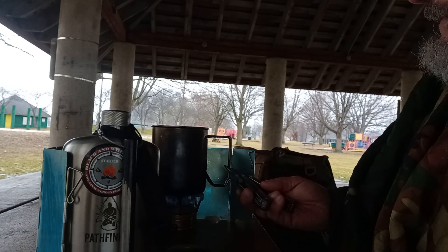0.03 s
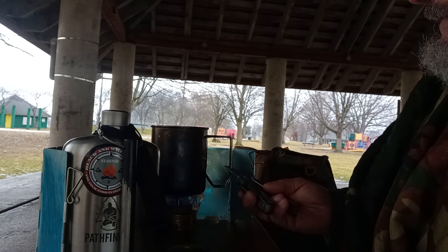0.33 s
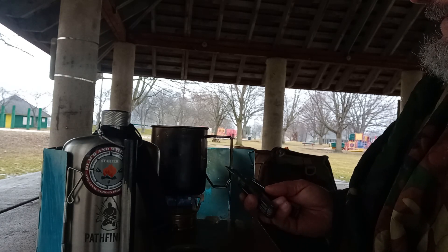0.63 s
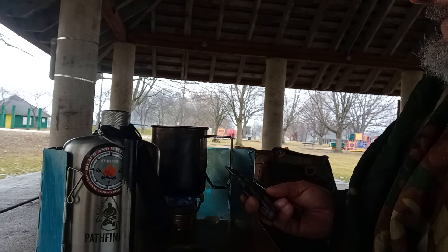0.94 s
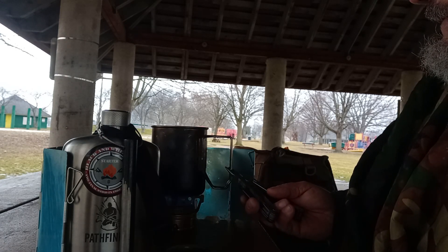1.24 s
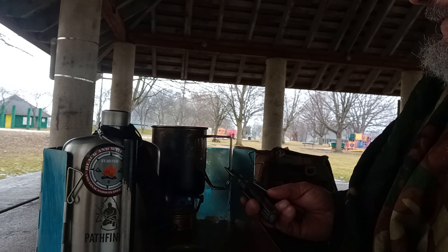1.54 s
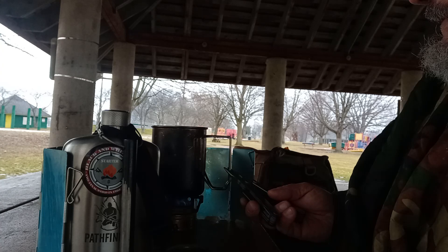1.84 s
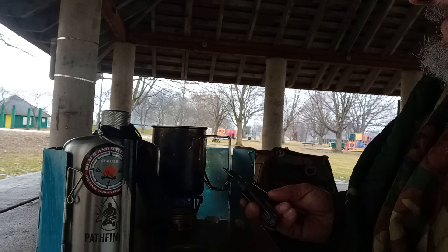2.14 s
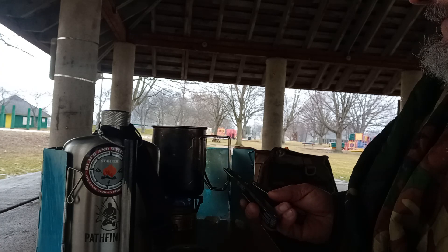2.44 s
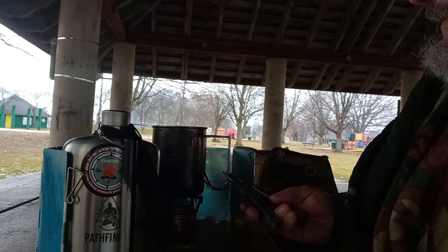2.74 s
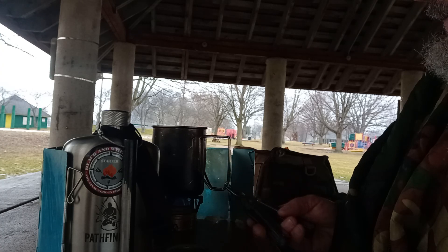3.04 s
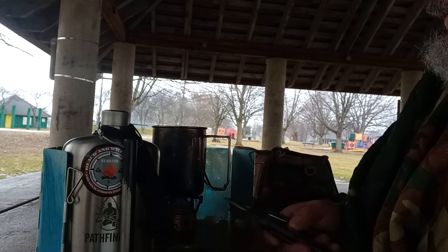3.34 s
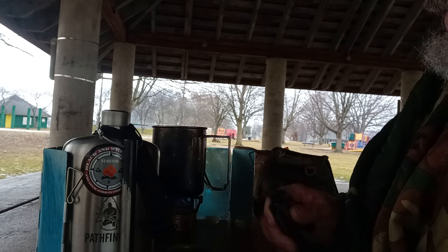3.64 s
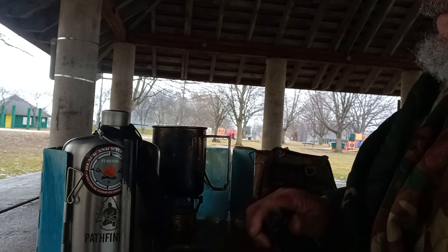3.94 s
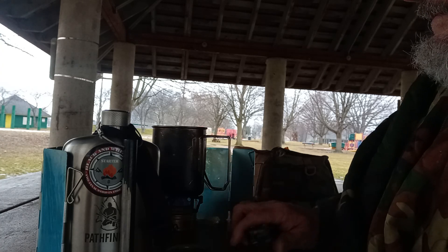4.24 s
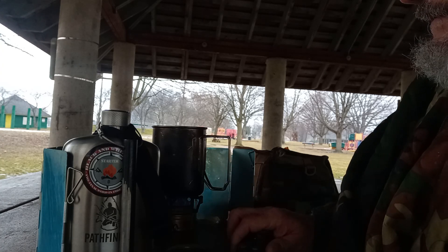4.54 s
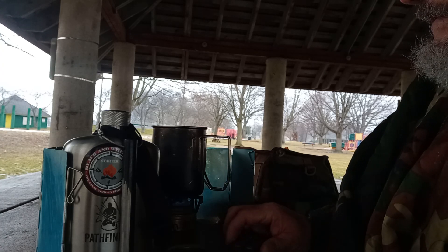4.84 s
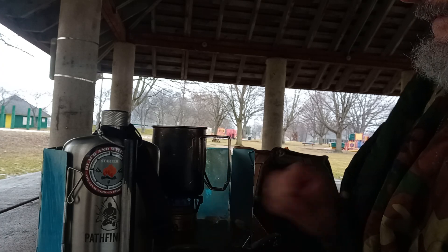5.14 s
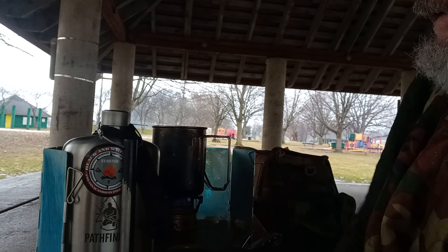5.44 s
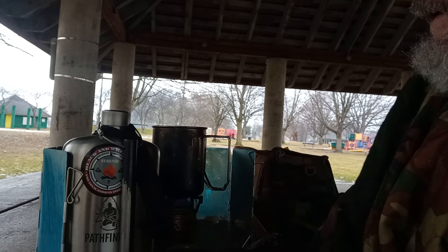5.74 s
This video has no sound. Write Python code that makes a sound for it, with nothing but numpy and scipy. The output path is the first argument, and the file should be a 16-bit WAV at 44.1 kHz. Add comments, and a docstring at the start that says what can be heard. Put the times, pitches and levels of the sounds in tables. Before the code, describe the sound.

Scattered drops of rainwater ping and splash around an open wooden shelter, some close and crisp, others distant with a short roof echo. Fine patter, a soft outdoor hiss and a low rumble lie behind them. About four seconds in, a hand tool is set down on the picnic table beside the microphone, with a few dull bumps and then one hard, rattling knock. The dripping carries on.

```python
"""Rainwater drips around an open wooden shelter, heard from a picnic table inside it.
Near drops ping and spray; far ones splash, or plink as trapped bubbles, under the echo of the roof.
Behind them: fine patter, an outdoor wash, low rumble, a brief drone and a few soft thuds.
From 3.9 s a hand tool is set down on the table: dull bumps, then one hard, rattling knock.
Each blow travels as a bending wave and rings the planks."""
import sys
import numpy as np
from scipy import signal
from scipy.fft import rfft, irfft, next_fast_len
from scipy.io import wavfile
from scipy.ndimage import uniform_filter1d

SR = 44100
rng = np.random.default_rng(int(sys.argv[2]) if len(sys.argv) > 2 else 0)


def transcribe(u):
    """Save the signal u as a 16-bit wav file named by the first command-line argument.

    u: samples, shape (n,) or (channels, n), limited to [-1, 1]; the rate is SR.
    q: integer samples, one column per channel.
    """
    v = np.clip(np.atleast_2d(u).T, -1, 1)
    q = np.round(v * 32767).astype(np.int16)
    wavfile.write(sys.argv[1], SR, q)


N = 254898

# shelter decay: f/Hz, T60/s
SHELTER_T60 = [(150, 0.75), (400, 0.51), (1200, 0.34), (3000, 0.67), (4500, 0.52), (8000, 0.27),
               (10500, 0.18), (13000, 0.14)]
# first reflections off table, floor and roof: delay/ms, gain
REFLECTIONS = [(6.6, 0.47), (8.1, 0.19), (18.5, 0.073), (22, 0.051)]
# outdoor wash spectrum: f/Hz, relative level/dB
WASH_SPECTRUM = [(15, -45.5), (25, -23.5), (114, 3.5), (149, 1), (373, -7), (476, -6), (545, -12),
                 (1790, -16.5), (3080, -9.5), (3920, -2.5), (4250, -4.5), (5570, -35.5), (9570, -27.5),
                 (14800, -27), (16000, -24)]
# rumble swells: t/s, sigma/s, level/dB
RUMBLE_SWELLS = [(0.976, 0.033, -53), (2.943, 0.14, -52)]
# soft thuds: t/s, level/dB, f/Hz
THUD_EVENTS = [(1.021, -45, 101), (2.697, -35.5, 167), (3.328, -40, 143), (4.099, -35, 100),
               (5.405, -41, 106)]
# patter envelope: t/s, level/dB
PATTER_LEVEL = [(0, -55.5), (1.498, -71.5), (2.4, -55.5), (3.3, -53), (4.1, -77), (4.55, -54.5),
                (5.78, -59)]
# drops into standing water: t/s, level/dB, f/Hz, decay/ms
PLINK_EVENTS = [(0.059, -58, 2250, 10), (0.198, -58.5, 1743, 25), (1.087, -58.5, 2165, 3.9),
                (1.655, -58, 1650, 11), (1.724, -51.5, 2214, 14), (1.778, -55.5, 2310, 10),
                (1.873, -55.5, 3340, 11), (1.99, -56.5, 3300, 5), (2.41, -56, 2244, 9),
                (2.48, -61, 2370, 12), (3.066, -57.5, 1087, 42), (3.084, -58, 3230, 20),
                (3.18, -54, 3100, 20), (4.789, -56.5, 2670, 9.1), (5.197, -60, 2190, 13)]
# far drops: t/s, level/dB, f/Hz, width/octaves, direct-to-echo ratio
FAR_DROPS = [(0.023, -52, 3020, 0.43, 0.05), (0.17, -57, 1470, 0.21, 0.21), (.187, -52, 3330, 0.35, .2),
             (0.278, -47.5, 3315, .28, .15), (0.430, -45.5, 1624, 0.49, 0.76),
             (0.517, -44.5, 12600, 0.29, 1), (0.548, -51, 6900, 0.17, 0.71), (.563, -39.5, 3960, 0.25, 0.5),
             (0.58, -63, 7500, 0.39, .1), (0.843, -62.5, 10200, 0.3, 0.46), (1.016, -61, 8800, 0.14, 0.87),
             (1.088, -55.5, 7000, 0.26, 0.32), (1.096, -45.5, 4090, 0.16, 0.61),
             (1.282, -47.5, 3980, 0.15, 0.28), (1.599, -54, 4040, 0.091, 0.68),
             (1.651, -54, 1980, 0.36, 0.39), (2.257, -54.5, 10700, 0.67, 0.56),
             (2.331, -66, 6900, 0.12, 0.28), (2.797, -57.5, 2550, 0.21, 0.27),
             (2.92, -45.5, 3800, 0.23, 0.28), (2.92, -58, 7130, 0.53, 0.13), (2.952, -55, 1580, 0.34, .1),
             (2.96, -61.5, 7700, 0.2, .1), (3.004, -66, 6400, 0.32, .1), (2.994, -46, 3800, 0.23, 0.12),
             (3.024, -52, 1465, 0.13, .4), (3.045, -64, 5350, .15, 0.37), (3.052, -46, 3420, 0.27, 0.29),
             (3.247, -53.5, 2970, 0.19, 0.78), (3.25, -63, 6520, 0.93, .2), (3.626, -54, 2000, 0.35, 0.17),
             (3.666, -63, 8250, 0.18, 0.5), (3.844, -50.5, 3860, 0.13, .1), (3.937, -48, 7030, 0.8, 1),
             (4.295, -49, 8560, 0.23, 0.95), (4.317, -43, 3750, 0.24, 0.15), (4.41, -53.5, 3780, 0.28, .2),
             (4.675, -62.5, 6630, 0.15, 0.82), (4.859, -46.5, 3640, 0.12, 1),
             (4.86, -52.5, 1672, 0.4, 0.75), (4.97, -51, 4140, 0.17, 0.11),
             (5.103, -61.5, 6540, 0.19, 0.16), (5.145, -69.5, 6600, 0.13, 0.11),
             (5.104, -43.5, 4250, 0.22, 0.41), (5.236, -54.5, 3020, 0.32, 0.82),
             (5.529, -51, 2840, 0.21, 0.16), (5.547, -50.5, 3150, 0.41, 0.4),
             (5.555, -55, 10000, 0.45, 0.46)]
# near drops: t/s, ping/dB, f/Hz, spray/dB, echo gain/dB
NEAR_DROPS = [(0.201, -31.5, 3700, -43, -8), (0.371, -30.5, 3780, -58, 1), (0.483, -27.5, 3920, -57, -7.5),
              (.5100, -36, 3860, -28.5, -2), (0.518, -32, 4230, -43, -3), (0.5507, -25, 4210, -29, 0.5),
              (0.692, -47, 3600, -40.5, 3.5), (0.7613, -31, 4440, -46, -6),
              (0.7697, -33.5, 4030, -42, -1.5), (1.2048, -36.5, 4220, -67, -1.5),
              (2.197, -34.5, 3820, -19.5, -4.5), (2.203, -45, 4140, -42, 0), (2.231, -38, 3600, -41, -3),
              (2.2491, -31.5, 4130, -32, -1.5), (2.258, -38, 4220, -25.5, -10),
              (2.4376, -36, 4270, -69, -1), (2.643, -35.5, 3150, -64, -4.5), (2.845, -57, 3600, -38, 0),
              (2.8668, -40, 3640, -60, -1), (3.1621, -26.5, 3260, -60, -7), (3.4282, -29, 3590, -50, -10),
              (3.444, -33, 3930, -61, -1), (4.494, -31, 3830, -30.5, -9), (4.9039, -25, 4260, -28, -10),
              (5.609, -24.5, 4220, -23.5, -4)]
# plank modes: f/Hz, relative level/dB, T60/s
PLANK_MODES = [(102, -20, .8), (157, -2, .83), (200, 0.5, .55), (232, -7, .55), (254, -6, .68),
               (313, -9, .45), (415, -7, .4), (445, -11, .35), (485, -4, .48), (522, -8, .42),
               (544, -6, .35), (588, -5, .38), (625, -14, .3), (695, -7, .3), (893, -1, .28),
               (919, -4, .24), (943, -5, .26), (1001, -11, .28), (1145, 3.5, .42), (1309, -8, .45),
               (1217, -5, .41), (1347, -7.5, .66), (1385, -12, .62), (1440, -13, .58), (1497, -12, .58),
               (1542, -9, .4), (1585, -13, .6), (1647, -13, .46), (1719, -8, .35), (1888, -7, .3),
               (2056, -10, .35), (2169, -13, .45), (2290, -9, .4), (2500, -12, .52), (2645, -5, .35),
               (2740, -13, .55), (2958, -10, .35), (3700, -12, .5), (4200, -12, .5)]
# blow spectrum: f/Hz, relative level/dB
BLOW_SPECTRUM = [(30, -23), (90, -19), (160, 0), (280, 7), (390, -5), (520, 4), (750, -1), (1200, 3),
                 (2000, 5), (2700, 4), (4200, 4.5), (5000, -20), (6000, -17), (15000, 26.5)]
# direct wave and returns from the table ends: delay/ms, gain
END_RETURNS = [(0, 1), (2.63, 0.079), (5.26, 0.032)]
# tool blows: t/s, strength/dB, cutoff/Hz, bass lag/ms, ring gain/dB, echo gain/dB
TOOL_BLOWS = [(3.899, -6, 1230, 10.3, 3, -6.5), (3.929, -6.5, 520, 6.4, 1.5, -9),
              (4.064, -17, 289, 6, 12, 10), (4.087, -18, 720, 6.9, 2, -14), (4.2227, -3, 1050, 7.5, 0.5, 0),
              (4.290, -8.5, 425, 6, 2, 7.5), (4.324, -24, 553, 5.6, -4, 12.5),
              (4.4913, 0.5, 1270, 4.8, -9, -24), (4.495, -2, 267, 2.47, -4, -7),
              (4.515, 9.5, 3870, 1.86, 2, -3.5), (4.518, 7, 3800, 2.02, -16.5, -6),
              (4.5212, 7, 1580, 2.32, -29.5, 3.5), (4.572, 0.5, 262, 3.47, -14, -2)]


def amp(db):
    return 10 ** (np.asarray(db) / 20)


def unit_rms(x):
    return x / np.sqrt(np.mean(x ** 2) + 1e-20)


def unit_energy(x):
    return x / (np.linalg.norm(x) + 1e-20)


def unit_onset(x):
    """Unit RMS over the first 33 ms."""
    return x / np.std(x[:SR // 30])


def at_hz(table, hz):
    f, value = np.transpose(table)
    return np.interp(np.log(hz + 1), np.log(f + 1), value)


def add(mix, start_s, sound):
    part = mix[max(round(start_s * SR), 0):][:len(sound)]
    part += sound[:len(part)]


def fft_filter(x, response):
    size = next_fast_len(len(x) + 4096)
    return irfft(rfft(x, size) * response(np.fft.rfftfreq(size, 1 / SR)), size)[:len(x)]


def band(x, hz, octaves):
    return fft_filter(x, lambda f: np.exp(-.5 * (np.log2((f + 1) / hz) / octaves) ** 2))


def lowpass(x, hz, order):
    return signal.sosfilt(signal.butter(order, hz, fs=SR, output="sos"), x)


def delay_sum(x, taps):
    out = np.zeros(len(x))
    for delay_ms, gain in taps:
        add(out, delay_ms / 1000, gain * x)
    return out


def swell(peak_s, sigma_s):
    return np.exp(-.5 * ((np.arange(N) / SR - peak_s) / sigma_s) ** 2)


def wander(rate_hz):
    return unit_rms(lowpass(rng.standard_normal(N), rate_hz, order=2))


def shelter_ir(build_s=0.00031):
    """1 s of shelter echo, new per call; each band decays at its own rate."""
    hz, t, spectrum = signal.stft(rng.standard_normal(SR), SR, nperseg=256)
    decay = amp(-60 * t / at_hz(SHELTER_T60, hz)[:, None])
    tail = signal.istft(spectrum * decay, SR, nperseg=256)[1][:SR]
    return unit_energy(tail * (1 - np.exp(-np.arange(SR) / SR / build_s)))


def reverb(x, length):
    return signal.fftconvolve(x, shelter_ir())[:length]


def wash(level_db=-54):
    """Wet outdoor wash: noise drifting in narrow time-frequency patches."""
    hz, _, spectrum = signal.stft(rng.standard_normal(N), SR, nperseg=1024, noverlap=768)
    patches = uniform_filter1d(rng.standard_normal(spectrum.shape), size=12, axis=0)
    patches = unit_rms(uniform_filter1d(patches, size=5, axis=1))
    depth_db = np.interp(hz, [300, 700, 1500, 10000, 13000], [2.6, 1.3, 2.7, 2.7, 1.2])
    colour_db = at_hz(WASH_SPECTRUM, hz) + np.interp(hz, [1000, 2000], [0, -3.5])
    spectrum *= amp(colour_db[:, None] + depth_db[:, None] * patches)
    return amp(level_db) * unit_rms(signal.istft(spectrum, SR, nperseg=1024, noverlap=768)[1][:N])


def rumble(floor_db=-58, flutter_db=4):
    """Distant low noise that flutters and swells."""
    level = amp(floor_db) + sum(amp(db) * swell(s, sigma_s) for s, sigma_s, db in RUMBLE_SWELLS)
    flutter = amp(flutter_db * wander(rate_hz=6))
    return level * unit_rms(flutter * band(rng.standard_normal(N), hz=108.4, octaves=0.52))


def drone(level_db=-52, centre_hz=95, waver_hz=7):
    """Wavering tone, like a far engine; swells once and fades."""
    hz = centre_hz + waver_hz * wander(rate_hz=6)
    return amp(level_db) * swell(peak_s=3.1, sigma_s=0.47) * np.sin(2 * np.pi * np.cumsum(hz) / SR)


def thuds(wet=0.82):
    """Single soft pushes, each with a low echo."""
    out, t = np.zeros(N), np.arange(SR // 2) / SR - .02
    for s, db, hz in THUD_EVENTS:
        push = np.exp(-2 * (t * hz) ** 2) * np.cos(2 * np.pi * hz * t)
        echo = unit_energy(reverb(push, len(t))) * np.linalg.norm(push)
        add(out, s + t[0], amp(db) * (push + wet * echo))
    return out


def mist(level_db=-75, rate_per_s=150, spread_db=6, wet=1.6):
    """The tiniest droplets: faint high ticks all around."""
    sizes = amp(spread_db * np.minimum(rng.exponential(1, N), 3))
    ticks = band((rng.random(N) < rate_per_s / SR) * sizes, hz=8600, octaves=0.52)
    return amp(level_db) * unit_rms(delay_sum(ticks, REFLECTIONS) + wet * reverb(ticks, N))


def patter(rate_per_s=30, spread_db=4.5, decay_s=0.003):
    """Small distant drops: pings of random size at 16 pitches."""
    out, t = np.zeros(N), np.arange(512) / SR
    pitches_hz = np.geomspace(3250, 4450, num=16)
    for hz in pitches_hz:
        hits = rng.random(N) < rate_per_s / len(pitches_hz) / SR
        sizes = amp(spread_db * np.minimum(rng.exponential(1, N), 2.2))
        ping = t * np.exp(-t / decay_s) * np.sin(2 * np.pi * hz * t)
        out += signal.oaconvolve(hits * sizes, ping)[:N]
    level_db = np.interp(np.arange(N) / SR, *np.transpose(PATTER_LEVEL))
    return amp(level_db) * unit_rms(out + reverb(out, N))


def splash(hz, octaves, direct, room_ir, gap_s=0.0012, bubble_decay_s=0.02,
           fallback_per_s=140, fallback_decay_s=0.028):
    """A drop bursts into four droplets; bubbles ring, thrown-up water lands again."""
    t = np.arange(1024) / SR - .003
    hits_s = np.append(0, np.cumsum(gap_s * rng.uniform(.4, 1.6, size=3)))
    sigma_s = .23 / (hz * octaves)
    pulses = [np.exp(-.5 * ((t - s) / sigma_s) ** 2) * np.sin(2 * np.pi * hz * (t - s)) for s in hits_s]
    droplets = unit_energy(sum(pulse / np.sqrt(k + 1) for k, pulse in enumerate(pulses)))
    after_s = np.arange(SR // 8) / SR
    landings = (rng.random(len(after_s)) < fallback_per_s / SR) * rng.standard_normal(len(after_s))
    fallback = unit_energy(signal.fftconvolve(droplets, landings * np.exp(-after_s / fallback_decay_s)))
    bubble_hz = hz * 2 ** (octaves * rng.uniform(-.7, .7, size=4))
    age_s = np.maximum(t, 0)
    tones = np.sin(2 * np.pi * np.outer(bubble_hz, age_s)).sum(0)
    bubbles = unit_energy(tones * np.exp(-age_s / bubble_decay_s) * np.hanning(len(t)) ** .5)
    sound = unit_energy(signal.fftconvolve(droplets + amp(-7) * bubbles, room_ir))
    add(sound, 0, direct * droplets)
    add(sound, .006, amp(-4.5) * fallback)
    return unit_onset(sound)


def drizzle(count=170, gain_db=-44, tilt_db_per_octave=0.5):
    """Faint splashes of random pitch, coloured like the wash."""
    out, room_irs = np.zeros(N), [shelter_ir()[:SR // 3] for _ in range(3)]
    for k, (jitter, pitch, size) in enumerate(rng.random((count, 3))):
        hz = 1250 * 9 ** pitch
        colour_db = min(at_hz(WASH_SPECTRUM, hz), -25) + tilt_db_per_octave * np.log2(hz / 4000)
        sound = splash(hz, octaves=.15, direct=.35, room_ir=room_irs[k % 3])
        add(out, (k + jitter) / count * N / SR, amp(gain_db + colour_db + 8 * size) * sound)
    return out


def plinks(rise_per_s=0.24):
    """A trapped bubble rings, rising slightly in pitch, and echoes under the roof."""
    out, t = np.zeros(N), np.arange(SR // 2) / SR
    for s, db, hz, decay_ms in PLINK_EVENTS:
        phase = 2 * np.pi * hz * (t + rise_per_s * t ** 2 / 2)
        bubble = unit_energy(np.exp(-t * 1000 / decay_ms) * np.sin(phase))
        echo = unit_energy(reverb(bubble, len(t)))
        add(out, s, amp(db) * unit_onset(bubble + echo))
    return out


def far_drops():
    """Larger far splashes, heard mostly as roof echo."""
    out = np.zeros(N)
    for s, db, hz, octaves, direct in FAR_DROPS:
        add(out, s - .003, amp(db) * splash(hz, octaves, direct, shelter_ir()[:SR // 2]))
    return out


def near_drops(rise_s=0.00088, snap_decay_s=0.00071, sizzle_decay_s=0.012):
    """A short ping and a snap of spray that falls back as sizzle; the shelter reflects both."""
    out, t = np.zeros(N), np.arange(SR // 2) / SR
    ping_env = (t / rise_s * np.exp(1 - t / rise_s)) ** 2
    spray_env = np.exp(-t / snap_decay_s) + 0.085 * np.exp(-t / sizzle_decay_s)
    for s, ping_db, hz, spray_db, echo_db in NEAR_DROPS:
        ping = ping_env * np.sin(2 * np.pi * hz * t)
        spray = spray_env * band(rng.standard_normal(len(t)), hz=10000, octaves=1.0)
        drop = amp(ping_db) * ping + amp(spray_db) * spray / abs(spray).max()
        early = drop + amp(echo_db) * delay_sum(drop, REFLECTIONS)
        add(out, s, early + amp(echo_db - 1) * reverb(early[:1024], len(t)))
    return out


def bending_wave(lag_ms, fastest_hz=3000):
    """Dispersion in the planks: treble arrives first, 400 Hz lag_ms later."""
    def response(f):
        slowness = np.maximum(np.sqrt(fastest_hz / (f + 60)) - 1, 0)
        delay_s = lag_ms / 1000 * slowness / np.interp(400, f, slowness)
        return amp(at_hz(BLOW_SPECTRUM, f)) * np.exp(-2j * np.pi * np.cumsum(delay_s) * f[1])
    return delay_sum(fft_filter(signal.unit_impulse(SR, 16), response), END_RETURNS)


def tool_knocks(ring_rise_s=0.0006, early_ring_s=0.018):
    """Each blow crosses the planks and rings them; blow and early ring excite the shelter."""
    out, t = np.zeros(N), np.arange(SR) / SR
    modes = sum(amp(db - 60 * t / t60_s) * np.sin(2 * np.pi * (hz * t + rng.random()))
                for hz, db, t60_s in PLANK_MODES)
    modes *= 1 - np.exp(-t / ring_rise_s)
    for s, db, cutoff_hz, lag_ms, ring_db, echo_db in TOOL_BLOWS:
        blow = lowpass(bending_wave(lag_ms), cutoff_hz, order=4)  # softer contact, less treble
        # plank joints scatter the wave, more on a longer path
        joints = unit_energy(rng.standard_normal(1024) * np.exp(-t[:1024] / .009))
        blow = unit_energy(blow + (.4 + .1 * lag_ms) * signal.fftconvolve(blow, joints)[:SR])
        ring = unit_energy(lowpass(modes, 0.42 * cutoff_hz, order=3))
        radiated = lowpass(blow, hz=5630, order=1) + 0.8 * unit_energy(ring * np.exp(-t / early_ring_s))
        echo = unit_energy(signal.fftconvolve(radiated[:4096], shelter_ir(build_s=0.011))[:SR])
        click = unit_energy(band(rng.standard_normal(SR), hz=8000, octaves=0.33) * np.exp(-t / 0.0046))
        click += unit_energy(reverb(click[:1024], SR))
        # only hard, strong contacts click
        click_db = -39 + 1.2 * min(db - 5, 0) + 12 * np.log2(min(cutoff_hz / 1200, 1))
        add(out, s, amp(db) * (blow + amp(ring_db) * ring + amp(echo_db) * echo + amp(click_db) * click))
    # the knocks carry little deep bass
    return signal.sosfilt(signal.butter(4, 85, "highpass", fs=SR, output="sos"), out)


def scene():
    water = near_drops() + far_drops() + plinks() + drizzle() + patter() + mist()
    return (water + tool_knocks() + thuds() + wash() + rumble() + drone())[None]


def record(dry):
    """Band limit at 16.1 kHz."""
    fir = signal.firwin(255, 16100, window=("kaiser", 9), fs=SR)
    return signal.oaconvolve(dry, fir[None], "same")


dry = scene()
out = record(dry)
transcribe(out)
```